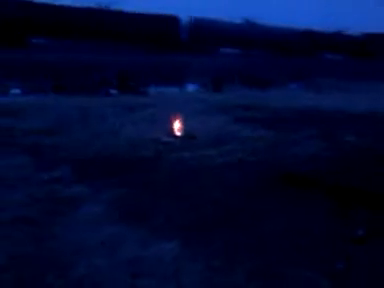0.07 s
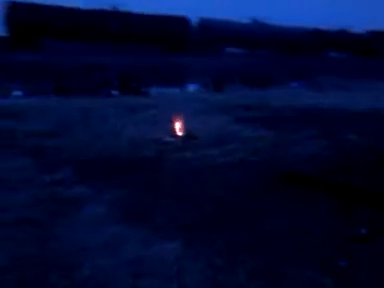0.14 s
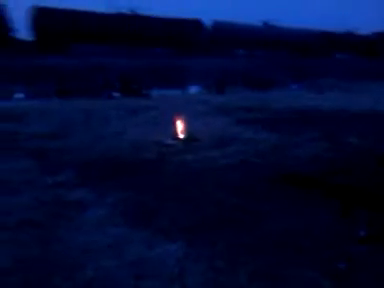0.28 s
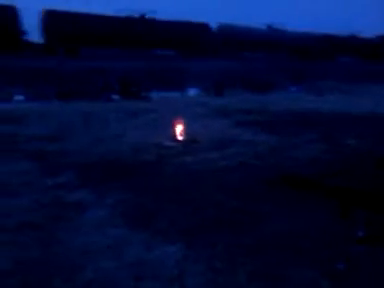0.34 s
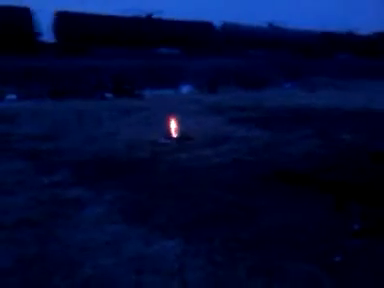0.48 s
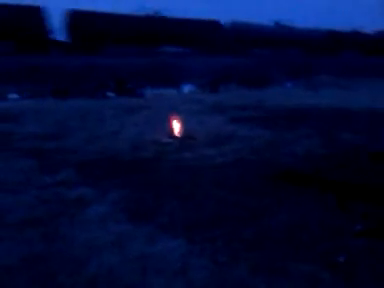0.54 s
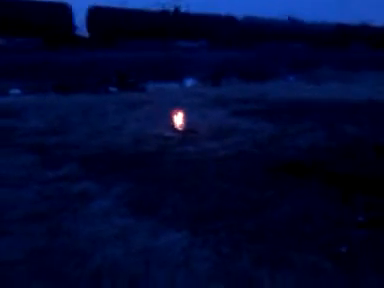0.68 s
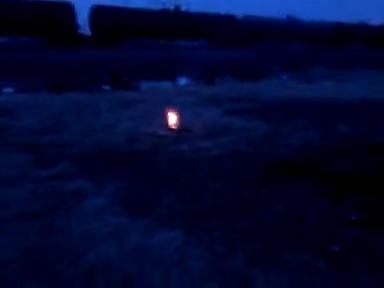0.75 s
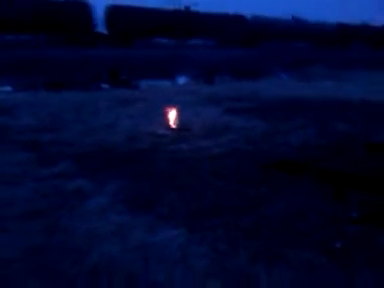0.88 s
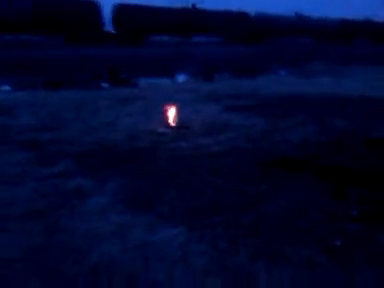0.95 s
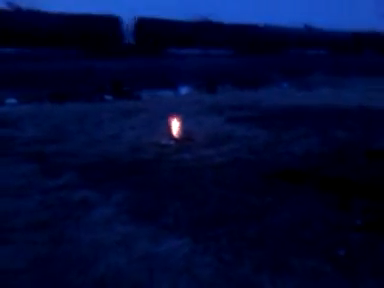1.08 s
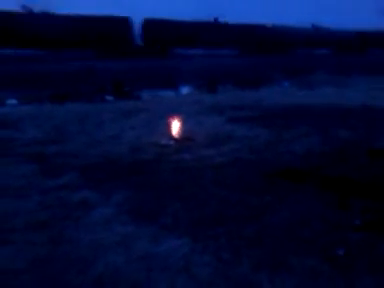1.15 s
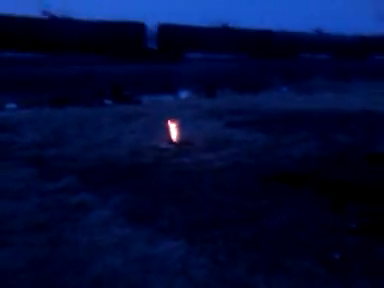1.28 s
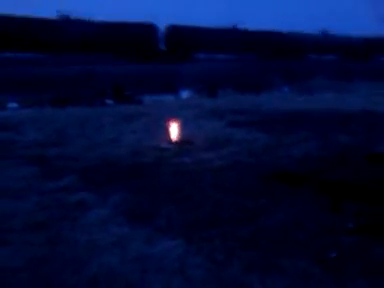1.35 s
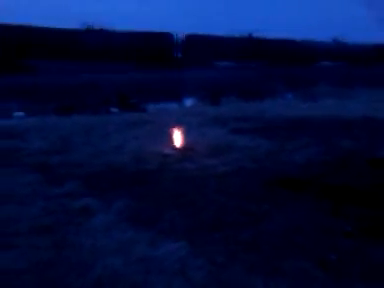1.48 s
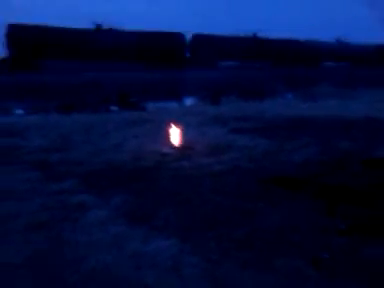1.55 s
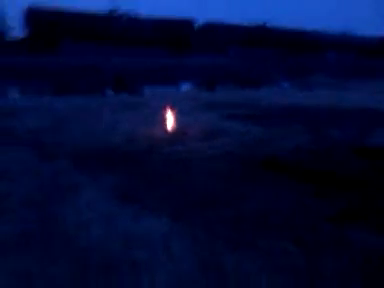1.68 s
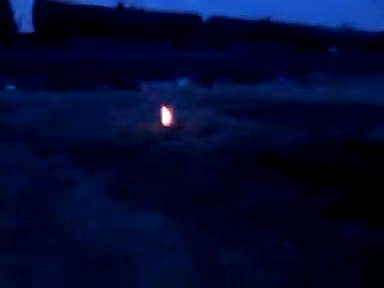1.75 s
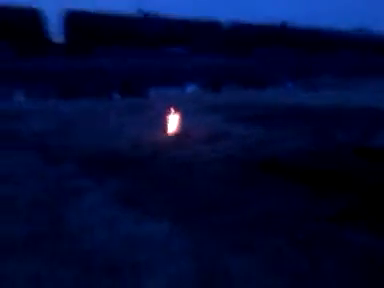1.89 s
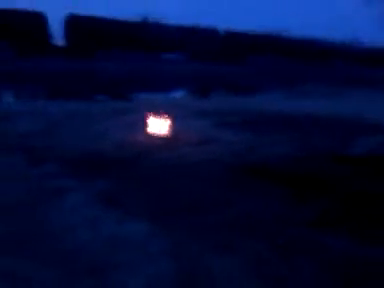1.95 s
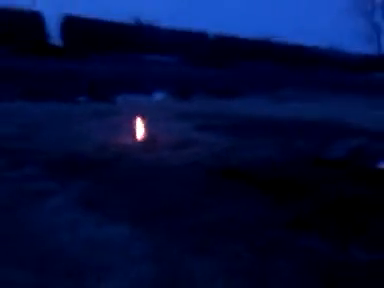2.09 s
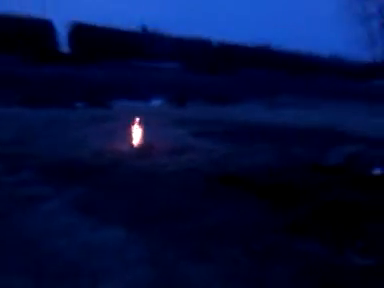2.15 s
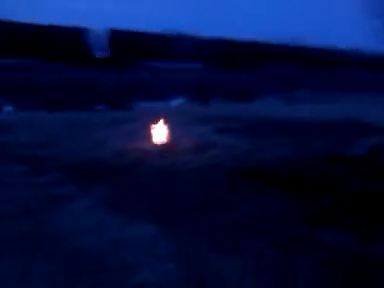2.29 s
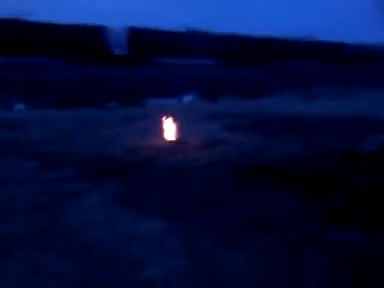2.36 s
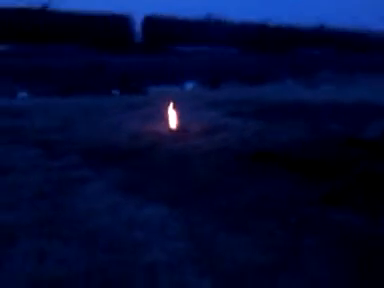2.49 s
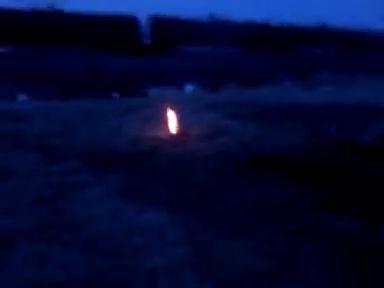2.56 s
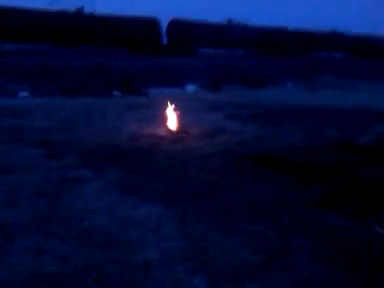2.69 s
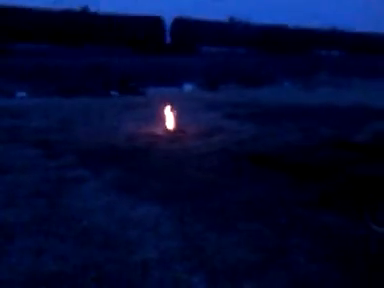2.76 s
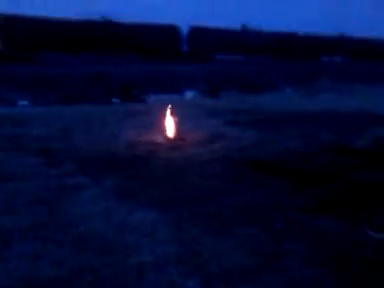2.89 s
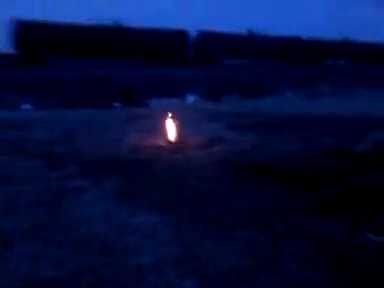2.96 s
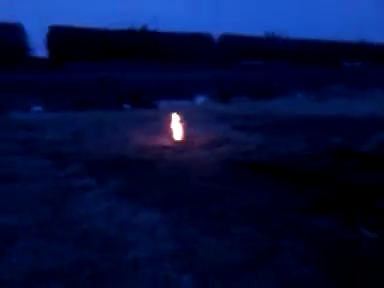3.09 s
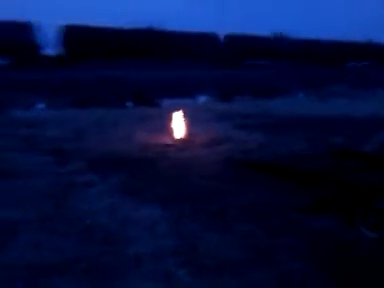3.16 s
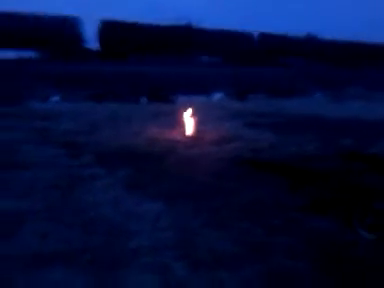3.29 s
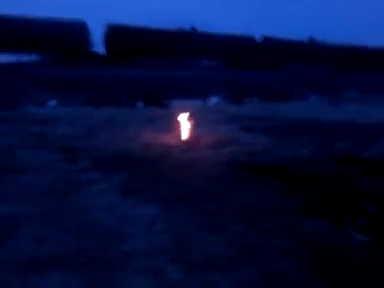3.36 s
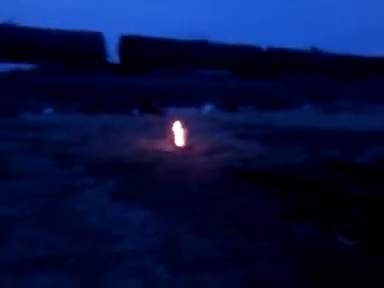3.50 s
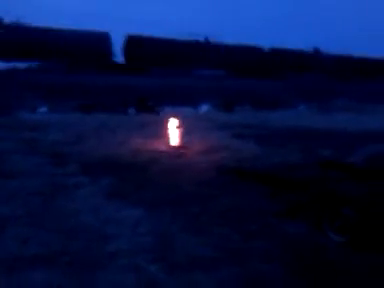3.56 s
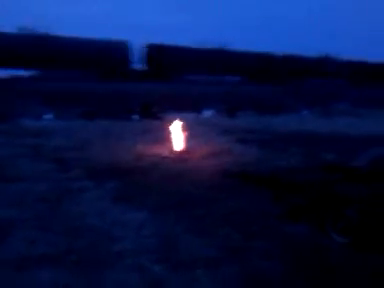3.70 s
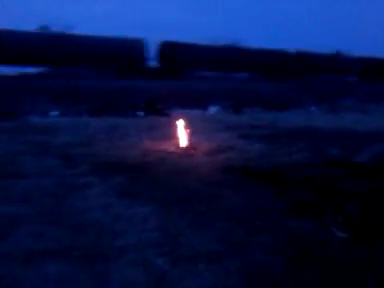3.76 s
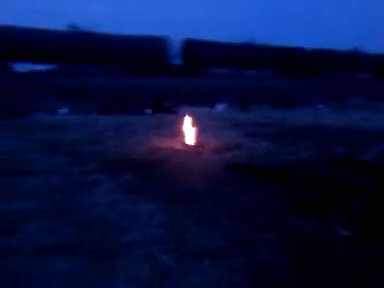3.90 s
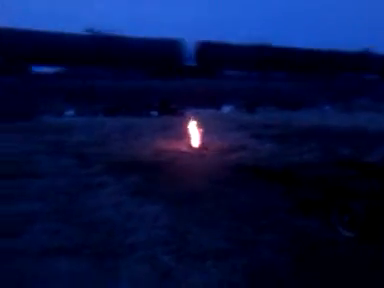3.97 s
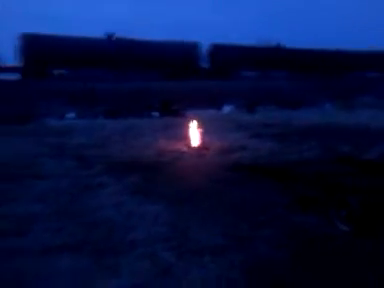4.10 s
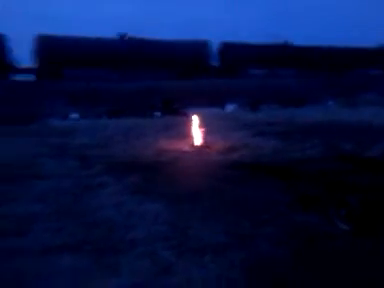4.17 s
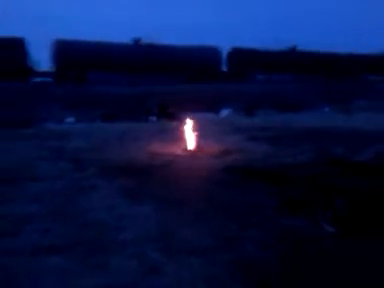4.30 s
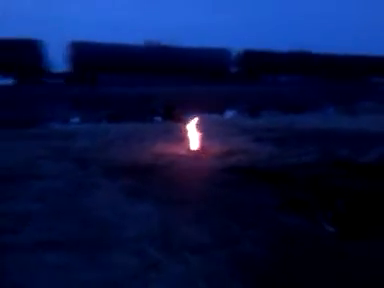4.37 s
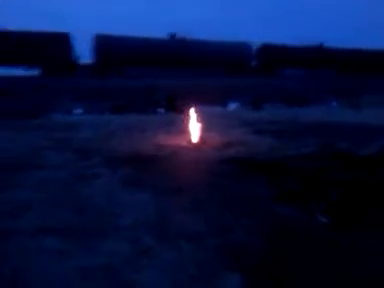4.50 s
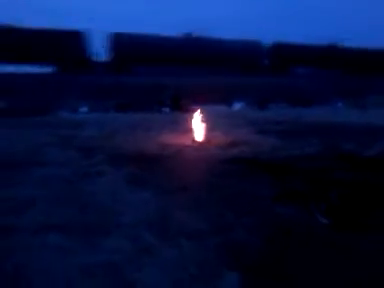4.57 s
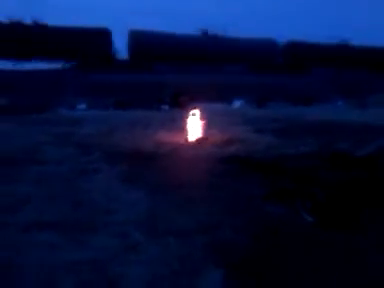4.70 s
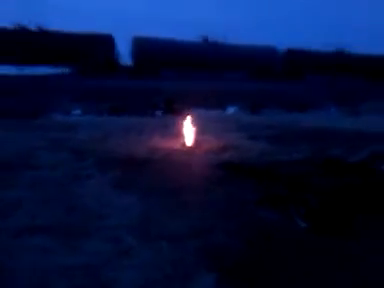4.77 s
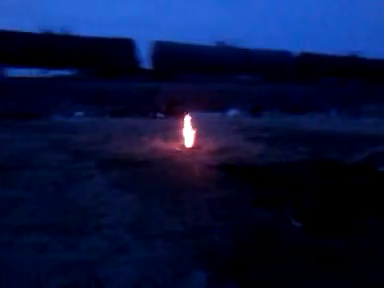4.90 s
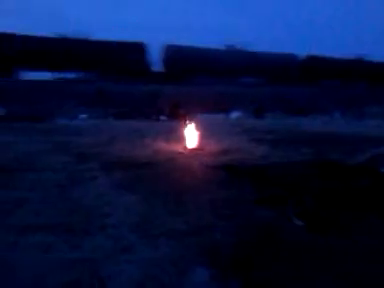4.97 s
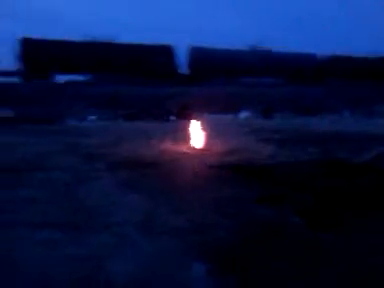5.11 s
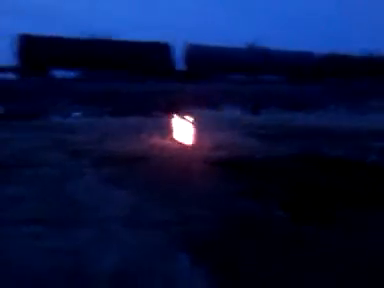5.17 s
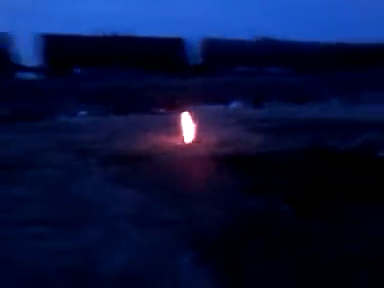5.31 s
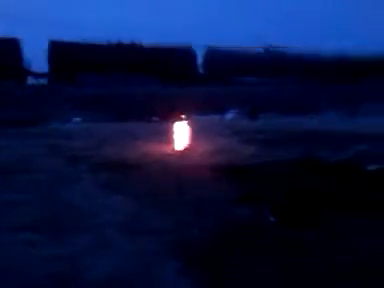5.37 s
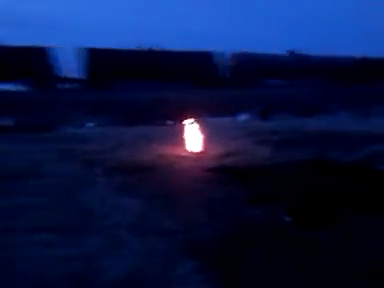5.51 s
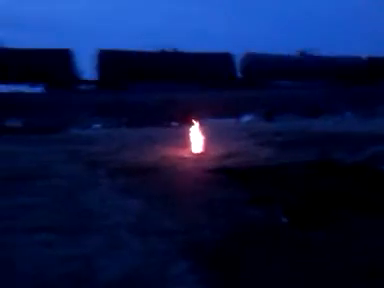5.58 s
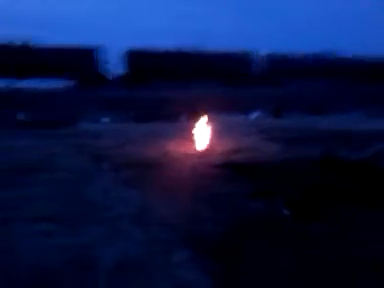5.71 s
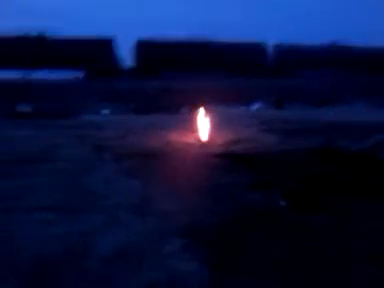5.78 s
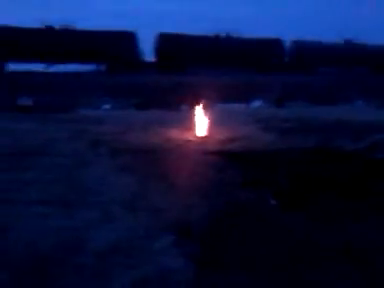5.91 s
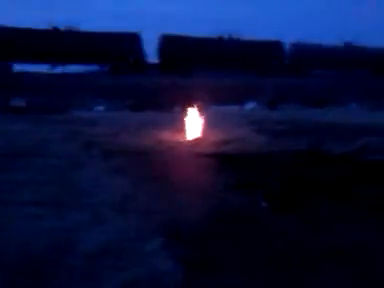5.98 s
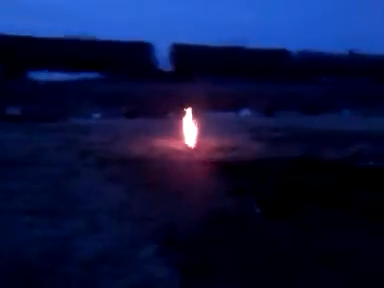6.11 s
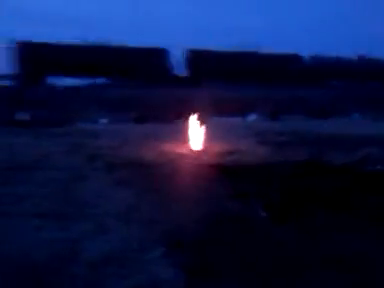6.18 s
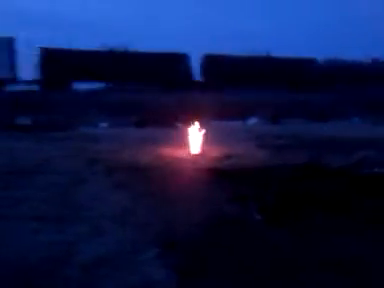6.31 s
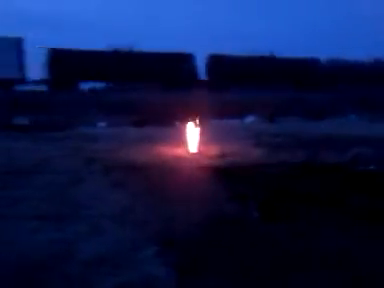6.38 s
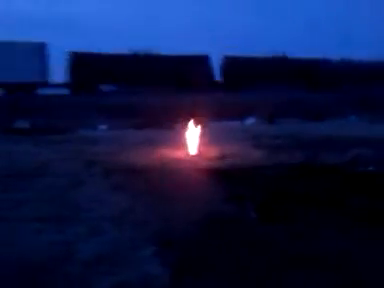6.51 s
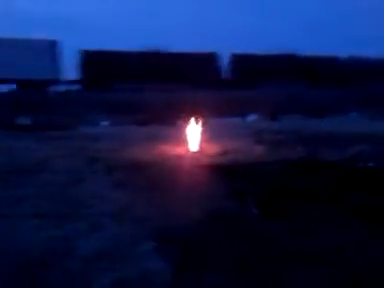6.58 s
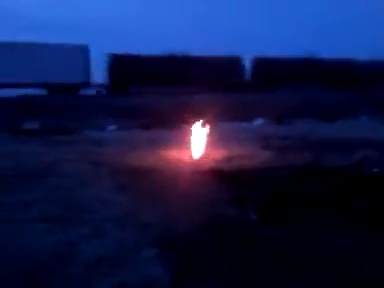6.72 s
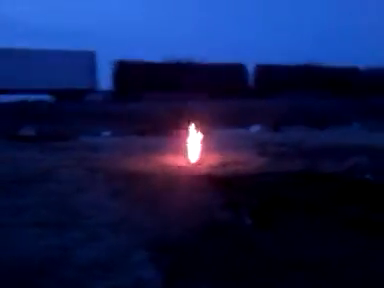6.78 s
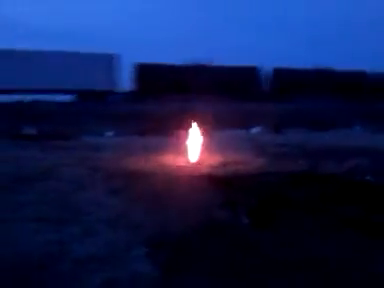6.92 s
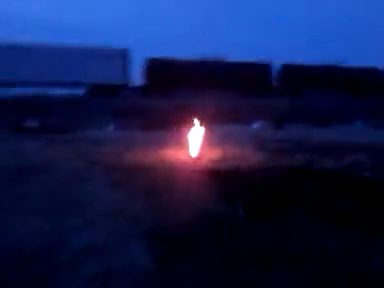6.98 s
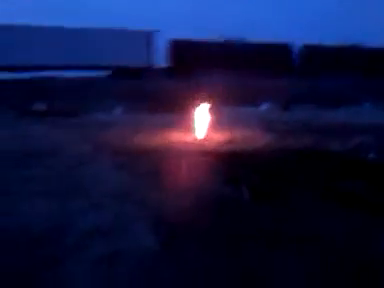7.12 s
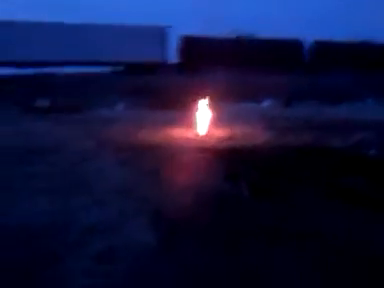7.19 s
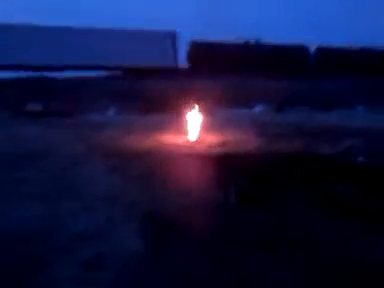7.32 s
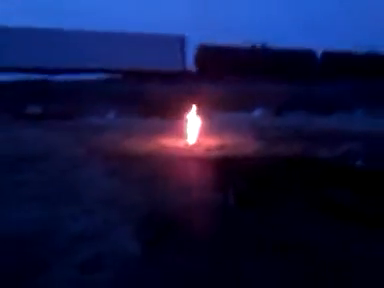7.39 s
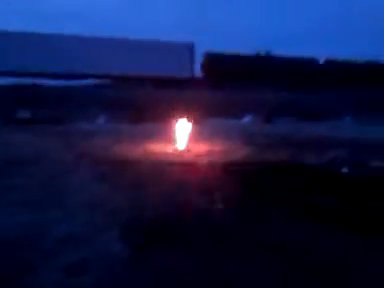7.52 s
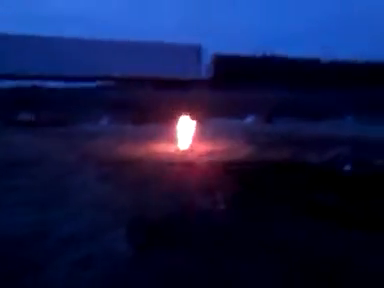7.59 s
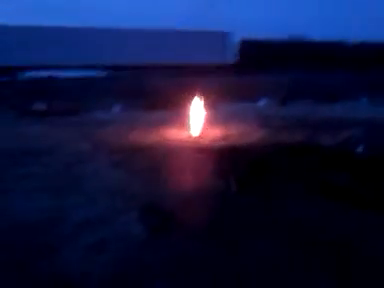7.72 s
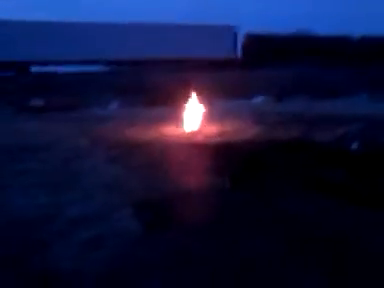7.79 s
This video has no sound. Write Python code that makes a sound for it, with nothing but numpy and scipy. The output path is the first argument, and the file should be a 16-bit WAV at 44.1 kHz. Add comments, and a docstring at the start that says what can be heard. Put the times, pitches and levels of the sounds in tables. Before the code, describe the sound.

After about half a second of silence, a freight train is heard rolling past across an open field: a low rumble, a rough track roar and a fluttering hiss of steel wheels. It grows slowly louder from about 3 seconds to the end. Worn wheels thump four or five times a second in runs that swell and fade, strongest around 1.3 seconds and again near 2.7, 4.3 and 5.7. Wagon bodies boom softly and loose steel fittings clink now and then. The wheels ring with wavering tones, most clearly from 5 seconds on. Sharper rail knocks land between 6.2 and 7.8 seconds, and near 7.5 a heavier boom comes with the brief low drone of a hollow wagon. Everything sounds dull and narrow, as through a pocket recorder, which adds a few thin ticks, the clearest near 4.9 and 7.1 seconds.

```python
"""First comes the rumble, roar and hiss of a freight train across a field, slowly drawing nearer.
Rough steel rolling on steel drives wagons, track and wheels into vibration, and some wheels ring.
Flat spots thump once a turn and shake the running gear; wagon bodies boom and loose fittings clink.
Near the end one hollow wagon drones past. All is heard through a narrow-band pocket recorder that
starts after about half a second and gives a few thin ticks in the louder, later part."""
import sys
import numpy as np
from scipy.fft import rfft, irfft, next_fast_len
from scipy.io import wavfile
from scipy.ndimage import map_coordinates

SR = 44100
rng = np.random.default_rng(int(sys.argv[2]) if len(sys.argv) > 2 else 0)


def wav_record(signal):
    """Record a signal, one row per channel, as 16-bit PCM in the file named by sys.argv[1]."""
    frames = np.transpose(np.atleast_2d(signal))
    bounded = np.clip(frames, -1, 1)
    # unit amplitude maps onto the largest positive 16-bit level
    quanta = np.round(bounded * 32767).astype(np.int16)
    wavfile.write(sys.argv[1], SR, quanta)


N = 346185
TIME = np.arange(N) / SR


def amp(db):
    """Amplitude ratio of a level in decibels."""
    return 10 ** (np.asarray(db) / 20)


def unit(x):
    """Normalisation to rms 1."""
    return x / np.sqrt(np.mean(x ** 2) + 1e-20)


def wobble(rate):
    """Random modulation: a smooth curve with rate knots a second."""
    return map_coordinates(rng.standard_normal(1024), [TIME * rate], mode="mirror")


def filtered(x, response):
    """Linear filtering: the spectrum of x times a frequency response."""
    size = next_fast_len(N + 8192)
    return irfft(rfft(x, size) * response(np.fft.rfftfreq(size, 1 / SR)), size)[:N]


def coloured(x, spectrum):
    """Spectral shaping by (f/Hz, level/dB) points, cut off above the last."""
    f, db = np.transpose(spectrum)
    return filtered(x, lambda hz: amp(np.interp(np.log(hz + 1), np.log(f), db, right=-120)))


def noise(spectrum):
    """Gaussian noise of that spectral shape, at rms 1."""
    return unit(coloured(rng.standard_normal(N), spectrum))


def mode(pitch, half_width):
    """Resonance under random excitation: a band of noise at rms 1."""
    return unit(filtered(rng.standard_normal(N), lambda hz: 1 / (1 + ((hz - pitch) / half_width) ** 2)))


def passing(t, centre, fade):
    """Gaussian pass-by envelope, down to 1/e at fade seconds either side of centre."""
    return np.exp(-((t - centre) / fade) ** 2)


def blows(times, levels, rise, t60):
    """Envelope of damped impacts: each swells and decays exponentially, and their powers add."""
    t = np.arange(SR) / SR
    shape = (1 - np.exp(-t / rise)) * amp(-60 * t / t60)
    power = np.zeros(N + 2 * SR)
    for onset, db in zip(times, levels):
        power[round(onset * SR):][:SR] += (amp(db) * shape / shape.max()) ** 2
    return np.sqrt(power[:N])


# Course of the rolling noise: t/s, track level/dB, wheel level/dB. Levels in all tables are relative.
ROLLING_LEVELS = [(0.6, -28, -22), (1.6, -29, -23.5), (2.6, -28.5, -23), (3.401, -25.5, -20.5),
                  (4.001, -25, -21.5), (4.8, -25.5, -20), (5.4, -25.5, -18.5), (6.2, -24, -19),
                  (6.801, -24, -19), (7.85, -25, -18.6)]
# Spectra of wagon rumble, track roar and wheel hiss: f/Hz, level/dB
WAGON_SPECTRUM = [(20, -43.5), (35, -33), (50, -18), (65, -6), (85, 2), (120, -2.5), (200, -4),
                  (290, -14.5), (500, -14), (1000, -50.5)]
TRACK_SPECTRUM = [(120, -22), (300, -2.5), (450, -3), (590, 1.5), (780, -2.5), (1100, -2), (1400, -3.5),
                  (2000, -6.5), (3400, -24), (4500, -55.5)]
WHEEL_SPECTRUM = [(700, -30), (1300, -15.5), (1560, -6.5), (1850, -3), (2100, -3), (2430, 0.5),
                  (2680, -1.5), (2950, -6), (3330, -6), (3600, -14), (3900, -22), (4200, -31),
                  (4750, -66.5)]

def rolling(rumble_db=-24.5, nearer_s=3.6, rise_db_per_s=1.5, roar_db=2.5, hiss_db=-1.5):
    """Roughness excitation: uneven steel on steel shakes the wagons, the track and the wheels."""
    times, *levels = np.transpose(ROLLING_LEVELS)
    roar, hiss = [np.interp(TIME, times, level) for level in levels]
    rumble = rumble_db + rise_db_per_s * np.maximum(TIME - nearer_s, 0)
    judder = wobble(45) + 0.5 * wobble(12)  # the contact force flutters, for track and wheels alike
    wagons = amp(rumble + 1.74 * wobble(30)) * noise(WAGON_SPECTRUM)
    track = amp(roar + roar_db + judder + 1.14 * wobble(38)) * noise(TRACK_SPECTRUM)
    wheels = amp(hiss + hiss_db + judder + 1.15 * wobble(150)) * noise(WHEEL_SPECTRUM)
    return wagons + track + wheels


# Modes of passing wheels: centre t/s, fade/s, f/Hz, half-width/Hz, level/dB
WHEEL_MODES = [(1.3, 2.2, 3303, 117, -36), (1.595, 2.4, 2470, 91.3, -39), (2.698, 0.66, 595, 80, -34),
               (4.1, 1.2, 2350, 138, -31.5), (5.509, 0.57, 2500, 109.7, -26), (5.604, 0.44, 568, 25, -35),
               (5.994, 0.49, 1286, 21.5, -33), (6.455, 0.78, 2330, 126.6, -25.5),
               (6.999, 0.69, 2110, 35.1, -32), (7.206, 0.89, 1930, 24.1, -28.5)]

def wheel_rings(waver_db=2.5):
    """Resonance: rolling drives narrow modes unevenly, each swelling and fading as its wheel goes by."""
    return sum(amp(db + waver_db * wobble(14)) * passing(TIME, centre, fade) * mode(pitch, half_width)
               for centre, fade, pitch, half_width, db in WHEEL_MODES)


# Wheels with a flat spot: loudest blow t/s, rotation period/s, fade/s, level/dB
FLAT_SPOTS = [(1.301, .2265, 1.04, -5.5), (2.684, .228, 0.64, -11), (4.273, .225, 0.84, -12.5),
              (5.698, 0.22, 0.51, -9)]

def flat_strikes(turns_each_side=4):
    """Periodic impact: a flat spot strikes once a turn. Gives rows of t/s, level/dB."""
    turns = np.arange(-turns_each_side, turns_each_side + 1)
    return [(t, db + 20 * np.log10(passing(t, centre, fade)))
            for centre, period, fade, db in FLAT_SPOTS for t in centre + period * turns]


# Single knocks of a wheel on the rail: t/s, level/dB
RAIL_KNOCKS = [(0.676, -11.5), (6.231, -13.5), (7.025, -9.5), (7.458, -12.5), (7.76, -12.5)]
# Spectra of the rail's crack and the sleepers' thud: f/Hz, level/dB
CRACK_SPECTRUM = [(300, -15), (600, 4.5), (950, -3.5), (1500, -11.5), (3000, -15.5), (4300, -43)]
SLEEPER_SPECTRUM = [(80, -23.5), (180, -5.5), (350, -17), (520, 1), (640, 2.5), (850, -3), (1100, -24.5),
                    (1600, -7), (3000, -27.5), (4300, -57)]

def wheel_blows(crack_db=-8, thump_db=-9, rattle_db=-18, rebound_s=0.036, rattle_lag_s=0.028):
    """Impact noise: a blow cracks on the rail, thuds through the sleepers and rattles the bogie."""
    times, db = np.transpose(flat_strikes() + RAIL_KNOCKS)
    crack = blows(times, db + crack_db, rise=0.00073, t60=0.036) * noise(CRACK_SPECTRUM)
    strike = blows(times, db + thump_db, rise=0.0027, t60=0.15)
    bounce = blows(times + rebound_s, db + thump_db - 5, rise=0.0041, t60=0.18)  # the wheel lands again
    thud = np.hypot(strike, bounce) * noise(SLEEPER_SPECTRUM)
    rattle = blows(times + rattle_lag_s, db + rattle_db, rise=0.047, t60=0.4) * noise(WHEEL_SPECTRUM)
    return crack + thud + rattle * amp(1.5 * wobble(110))


# Hard jolts to wagon bodies: t/s, level/dB
HARD_JOLTS = [(0.628, -11), (1.757, -8), (3.619, -11), (5.533, -8), (6.255, -8.5), (7.309, -10),
              (7.484, -1.5), (7.555, -9), (7.769, -8.5)]
# Spectrum of a hollow wagon body: f/Hz, level/dB
BODY_SPECTRUM = [(30, -42.5), (70, -7.5), (110, -1.5), (175, -1), (300, -9), (600, -32)]

def wagon_booms(boom_db=-9, light_count=14):
    """Free vibration: hollow bodies boom after a few hard jolts, and light ones at random moments."""
    light_times = (np.arange(light_count) + rng.random(light_count)) * N / SR / light_count
    light_jolts = np.transpose([light_times, rng.normal(-16, 2, light_count)])
    times, db = np.vstack([HARD_JOLTS, light_jolts]).T
    return blows(times, db + boom_db, rise=0.02, t60=0.17) * noise(BODY_SPECTRUM)


# Collisions of loose steel fittings: t/s, level/dB, f/Hz
FITTING_HITS = [(0.928, -22.5, 3120), (1.559, -23.5, 2500), (3.2, -22, 2470), (3.43, -24, 2260),
                (3.495, -21.5, 2410), (5.385, -19.5, 2480), (6.655, -16, 2380)]

def clinks(clink_db=-1, half_width_hz=220):
    """Damped resonance: couplers and brake rods knock together and ring briefly."""
    return sum(blows([onset], [db + clink_db], rise=0.0083, t60=0.19) * mode(pitch, half_width_hz)
               for onset, db, pitch in FITTING_HITS)


# The recorder's thin ticks: t/s, level/dB
TICK_EVENTS = [(4.888, -24.5), (5.492, -32.5), (5.601, -34), (6.116, -32), (6.24, -26.5), (6.3, -29.5),
               (7.059, -24), (7.339, -30.5), (7.346, -33), (7.36, -25.5), (7.476, -34), (7.745, -30)]
# Spectrum of a tick: f/Hz, level/dB
TICK_SPECTRUM = [(1000, -16.5), (4500, 6.5), (7000, 8), (10000, 5), (15900, -4)]

def ticks(spike_db=1, snap_db=-18, snap_hz=4900, max_lag_s=0.0066):
    """Impulses are broadband: these spikes, each trailed by a tiny snap, reach the high treble."""
    times, db = np.transpose(TICK_EVENTS)
    spikes = np.bincount(np.round(times * SR).astype(int), amp(db + spike_db), N)
    snap_times = times + max_lag_s * rng.random(len(times))
    snap_levels = db + snap_db + rng.normal(0, 2.4, len(times))
    snaps = blows(snap_times, snap_levels, rise=0.0003, t60=0.0055) * mode(snap_hz, half_width=500)
    return coloured(spikes, TICK_SPECTRUM) + snaps


def wagon_drone(drone_db=-25, waver_db=2):
    """Forced vibration: rolling keeps one hollow wagon body sounding while it passes."""
    envelope = amp(drone_db + waver_db * wobble(16)) * passing(TIME, centre=7.55, fade=0.35)
    return envelope * noise(BODY_SPECTRUM)


def scene():
    """Superposition: the sounds of the train add at one listening point."""
    return (rolling() + wheel_rings() + wheel_blows() + wagon_booms() + clinks() + wagon_drone())[None]


def record(dry, start_s=0.578, ceiling=0.72, band_hz=4720, top_hz=15870):
    """Saturation and band limiting: the recorder starts, rounds peaks, cuts treble and adds its ticks."""
    running = np.clip((TIME - start_s) / 0.005, 0, 1)
    rounded = dry[0] / (1 + np.abs(dry[0] / ceiling) ** 12) ** (1 / 12)
    narrow = filtered(rounded * running, lambda hz: np.clip((band_hz - hz) / 200, 0, 1))
    return filtered(narrow + ticks(), lambda hz: hz < top_hz)[None]


dry = scene()
out = record(dry)
wav_record(out)
```